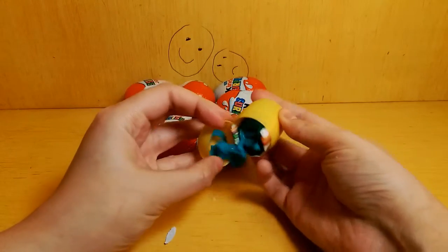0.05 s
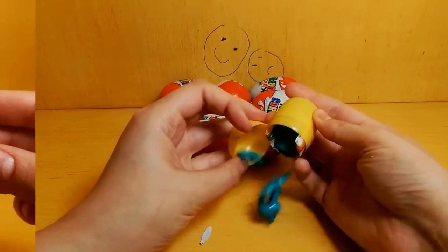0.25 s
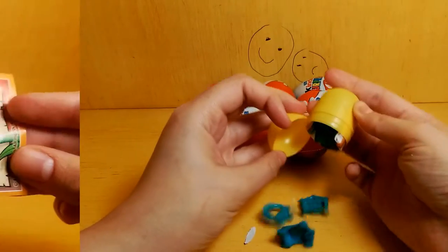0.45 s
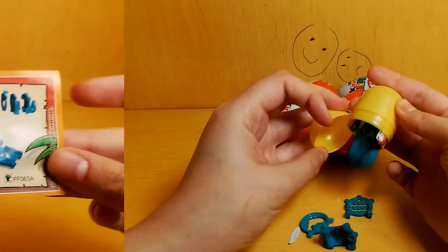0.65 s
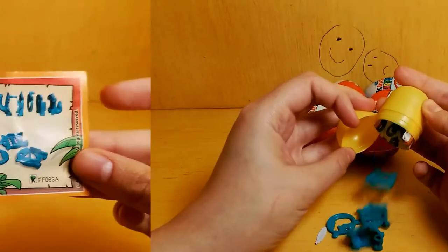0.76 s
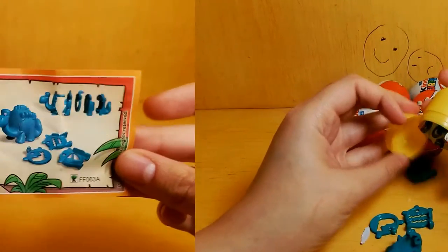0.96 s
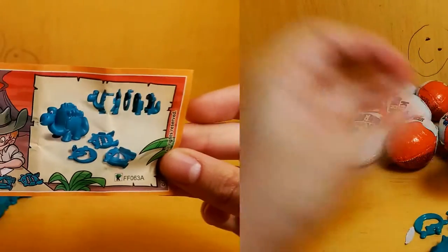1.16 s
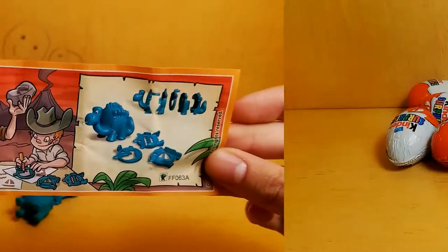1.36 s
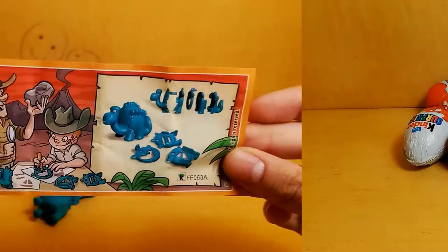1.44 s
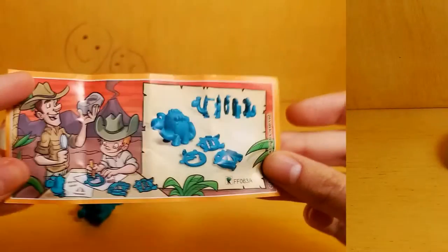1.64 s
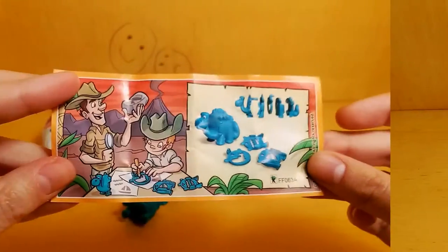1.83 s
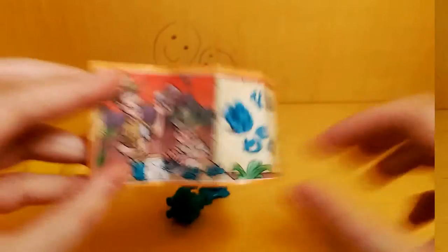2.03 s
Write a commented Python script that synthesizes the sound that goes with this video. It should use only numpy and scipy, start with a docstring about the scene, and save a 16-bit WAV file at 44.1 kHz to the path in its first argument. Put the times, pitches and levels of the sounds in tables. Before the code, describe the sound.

Plastic toy pieces click and bounce on a wooden desk, close to the microphone and slightly right. One bigger piece drops after them and rocks still, before a brief, soft paper rustle over a low room hum.

```python
"""A wooden desk in a small humming room, the microphone close by, the action a little to its right.
First small hard plastic toy parts slide in their capsule. They tip out, several land together and
bounce to rest, each contact a click and a short clatter that rings the part and the desk under it.
A last, larger part follows and rocks until it settles. Then a paper leaflet is handled softly, its
creases crackling and the sheet flapping, over the low hum of the room."""
import sys
import numpy as np
from scipy import signal
from scipy.fft import rfft, irfft, next_fast_len
from scipy.io import wavfile
from scipy.ndimage import uniform_filter1d

SR = 44100
rng = np.random.default_rng(int(sys.argv[2]) if len(sys.argv) > 2 else 0)


def store_pcm(level_fs):
    """Save levels as 16-bit WAV."""
    pcm = np.round(np.clip(level_fs, -1, 1) * 32767).astype(np.int16)
    wavfile.write(sys.argv[1], SR, np.atleast_2d(pcm).T)


N = 92610

# The four bands of a contact. Each row: lower edge in Hz, upper edge in Hz.
CONTACT_BANDS = [(700, 1600), (1600, 4000), (4000, 7500), (7500, 16000)]
# Parts shift in the capsule. Each row: start in seconds, then level in dB in each contact band.
CAPSULE_SHIFTS = [(.1087, -65.5, -58, -55.5, -40), (.1155, -72, -50.5, -46.5, -63),
                  (.13, -56, -52, -47.5, -40.5)]
# A part strikes the desk or another part. Each row: start in seconds, then level in dB in each band.
LANDINGS = [(0.2043, -29.5, -23.5, -21.5, -21), (0.216, -28, -21.5, -23, -28),
            (0.2296, -48, -56, -32, -29.5), (0.2484, -37, -37.5, -40, -48),
            (0.2723, -30.5, -30, -33.5, -64), (0.2925, -40, -58, -43, -27), (0.309, -47, -58, -63, -48),
            (0.3214, -44.5, -39, -48, -59), (0.3319, -30, -28.5, -30.5, -25.5),
            (0.3472, -34, -27.5, -30.5, -41), (0.372, -34.5, -34, -34, -36), (0.3816, -38, -28, -30, -34),
            (0.4094, -32.5, -32.5, -29.5, -29.5), (0.4184, -40, -33, -33, -55),
            (0.4267, -34, -39, -42, -40), (0.4295, -50, -47, -34, -28.5), (0.4418, -37.5, -33.5, -44, -34),
            (0.4541, -41.5, -37.5, -37.5, -57), (0.4672, -42, -42.5, -30.5, -33),
            (0.499, -40.5, -51, -36.5, -26.5), (0.5058, -40.5, -40, -38, -41),
            (0.5304, -48, -47, -40, -35.5), (0.549, -59.5, -56, -59, -39), (0.5658, -49, -58, -47, -45),
            (0.6241, -53.5, -51.5, -46, -49), (0.638, -49, -47, -47.5, -43.5),
            (0.666, -51, -55, -42.5, -44), (0.7231, -63, -54.5, -53, -55), (0.7558, -26.5, -22, -28, -29),
            (0.798, -58, -50, -38, -45.5), (0.8211, -42, -46, -42, -41), (0.8462, -32, -28, -27, -38.5),
            (0.8632, -49.5, -66, -45, -43.5), (0.9228, -38.5, -41, -31.5, -42.5),
            (0.9515, -36.5, -38.5, -29, -32), (0.9764, -40.5, -44, -41, -39),
            (1.0034, -45.5, -42, -35, -38.5), (1.023, -40, -52, -33.5, -44.5),
            (1.0365, -43, -50.5, -47, -45), (1.043, -65, -46.5, -39, -41),
            (1.0624, -49.5, -52, -35.5, -44.5), (1.0904, -53, -54, -46, -46),
            (1.1151, -59, -54.5, -45.5, -46)]
# Where a part lands, one resonance speaks out or is muted.
# Each row: start in seconds, frequency in Hz, width in Hz, gain in dB.
LANDING_ACCENTS = [(.2045, 9100, 400, 8), (.2928, 12660, 800, 9), (.7557, 424, 45, 6),
                   (.7557, 1017, 111, 11), (.7557, 2830, 98, 10), (.7557, 5020, 1640, -22),
                   (.8463, 1030, 120, 11), (.8463, 2966, 150, 5)]
# Parts slide in the capsule, then skitter between bounces. Each row: time in seconds, level in dB.
SKITTER_LEVEL = [(0, -54), (.08, -48), (.19, -59.5), (.33, -45), (.44, -43.5), (.58, -47), (.61, -55),
                 (.69, -55.5), (1.0, -86), (1.04, -51), (1.13, -66.5), (1.171, -99.5)]
# Resonances of the hollow capsule, the small parts, the large part and the desk.
# Each row: frequency in Hz, width in Hz, level in dB over the plain knock.
CAPSULE_MODES = [(2000, 24, 10), (3200, 130, 8.5)]
SMALL_PART_MODES = [(1012.5, 45, 11), (1853, 30, -5.5), (2847, 47, 9.5), (3270, 32, -2), (4534, 38, 7.5),
                    (8950, 490, 1.5)]
LARGE_PART_MODES = [(1368, 34, 5.5), (2930, 190, 0), (9040, 850, 6.5)]
DESK_MODES = [(104, 21, 11), (145.2, 13.2, 10.5), (184, 14.8, 16.5), (411.5, 24.7, 5), (801.7, 24, 8.5),
              (1137, 12, 2.5), (2224, 167, 5.5)]
# The parts' place at the microphone. Each row: frequency in Hz, left minus right in dB.
MIC_BALANCE = [(100, -2.5), (450, -2), (1000, 0), (2000, -4.5), (5000, -11.5), (9000, -7.5), (14000, 0.5)]
# The leaflet flexes. Each row: centre and spread in seconds, crackle level in dB, flap level in dB.
LEAFLET_FLEXES = [(1.618, 0.005, -58, -71), (1.948, 0.0069, -61.5, -54), (1.965, 0.0043, -52, -50),
                  (2.033, 0.042, -63, -63)]
# Tone colours. Each row: frequency in Hz, gain in dB.
KNOCK_COLOUR = [(40, -47), (110, -1.5), (230, -3), (315, -2.5), (430, -1), (680, -12), (1000, -3.5),
                (1700, -1), (2500, -3), (7500, -3), (13000, -3), (15500, -13)]  # plastic on wood
SKITTER_COLOUR = [(200, -12.5), (1000, -1), (3000, -10), (7000, -6), (14000, -16)]
CRACKLE_COLOUR = [(500, 1), (1500, -3.5), (4000, -0.5), (7000, -6.5), (9500, 1), (15000, -11)]
FLAP_COLOUR = [(60, -17), (140, 8.5), (260, -4), (380, 5.5), (620, -19.5), (790, 6.5), (1050, -15),
               (1620, -12), (9000, -30)]
REFLECTION_COLOUR = [(100, 3.5), (400, 6.5), (1200, -0.5), (4000, 4), (9000, -6), (15000, 1)]
AIR_COLOUR = [(30, -31), (52, -7), (80, -7.5), (130, 1.5), (175, -11.5), (230, -15), (380, -9.5),
              (620, -19), (1000, -17.5), (2000, -22), (4000, -26), (7000, -34), (9500, -30.5),
              (15000, -34.5)]
# How alike the two channels are. Each row: frequency in Hz, left-right likeness from 0 to 1.
REFLECTION_LIKENESS = [(200, 0.94), (700, 0.73), (2000, 0), (6000, 0)]
AIR_LIKENESS = [(180, 0.99), (550, 0.38), (1650, 0)]
# The room's hum. Each row: frequency in Hz, width in Hz. Then one level in dB for each tone.
HUM_TONES = [(53, 8), (143, 21.6), (388, 10), (557, 15)]
HUM_LEVELS = [-81, -65, -72.5, -74.5]
# A low rumble swells as the hands move. Each row: time in seconds, level in dB.
RUMBLE_LEVEL = [(.88, -67), (1.05, -58), (1.29, -66), (1.34, -69), (1.52, -65), (1.68, -57), (1.75, -51.5),
                (1.86, -65)]

LARGE_PART_FROM_S = .74
CLICK_DB, RING_S = -9, .0057  # click against clatter; the clatter's time constant
CRACK_S, CRACK_SHARE = .0032, .6  # the first, fast-dying part of the clatter
THUD_HZ, THUD_FULL_DB, THUD_FALL = 200, -30, .2  # lighter contacts lose extra bass, dB per dB short
MODE_SPREAD_DB, MODE_DETUNE = 3, .004  # from one contact to the next
LEFT_LAG_S, WALL_DELAY_S = .00033, .0028
NEAR_DB, NEAR_T60_S = -8.5, .15  # reflections from the desk and the wall behind it
ROOM_DB, ROOM_T60_S = -9, .4
CREASES_PER_S = 4500
AIR_DB, HUM_PAN_DB = -58, -6.5  # the pan is left minus right


def toy_parts():
    """Close up, the parts ring the capsule, then themselves and the desk as they land."""
    t = np.arange(N) / SR
    in_capsule = t < LANDINGS[0][0]
    slide = skitter(per_s=600) * in_capsule
    slide = signal.sosfilt(signal.butter(1, 4000, fs=SR, output="sos"), slide)
    inside = contacts(CAPSULE_SHIFTS, CAPSULE_MODES) + slide + ringing(slide, CAPSULE_MODES)
    small = contacts([row for row in LANDINGS if row[0] < LARGE_PART_FROM_S], SMALL_PART_MODES)
    large = contacts([row for row in LANDINGS if row[0] >= LARGE_PART_FROM_S], LARGE_PART_MODES)
    rattle = skitter(per_s=1000) * ~in_capsule
    rattle = rattle + ringing(rattle * (t < LARGE_PART_FROM_S), SMALL_PART_MODES)
    on_desk = colour(small + large + rattle, KNOCK_COLOUR)
    plastic = colour(inside, KNOCK_COLOUR) + on_desk
    return at_microphone(plastic, desk=ringing(on_desk, DESK_MODES))


def contacts(rows, modes, size=4096):
    """Each contact is a sharp click and milliseconds of dense clatter, ringing the modes its own way."""
    out, t = np.zeros((2, N + size)), np.arange(size) / SR
    low, high = np.transpose(CONTACT_BANDS)
    width_db = 10 * np.log10(RING_S * SR * SR / 2 / (high - low))  # band level to filter gain
    decay = rms_one(np.exp(-t / RING_S) + CRACK_SHARE * np.exp(-t / CRACK_S)) / np.sqrt(size)
    low_cut = signal.butter(2, 600, "high", fs=SR, output="sos")
    for start_s, *band_db in rows:
        hit = signal.sosfilt(low_cut, stereo_noise(size, likeness=.16) * decay)
        hit[:, 0] += amp(CLICK_DB)
        gain_db = band_db + width_db
        thud_db = gain_db[0] + THUD_FALL * min(band_db[0] - THUD_FULL_DB, 0)
        hit = colour(hit, [(THUD_HZ, thud_db), *zip(np.sqrt(low * high), gain_db)])
        struck = [(hz * (1 + MODE_DETUNE * rng.uniform(-1, 1)), width,
                   db + MODE_SPREAD_DB * rng.uniform(-1, 1)) for hz, width, db in modes]
        hit = hit + ringing(hit, struck)
        for accent_s, hz, width, db in LANDING_ACCENTS:
            if abs(accent_s - start_s) < .005:
                hit = hit + (amp(db) - 1) * resonate(hit, hz, width)
        start = int(start_s * SR)
        out[:, start:start + size] += hit
    return out[:, :N]


def skitter(per_s):
    """A run of tiny random touches as the parts slide and tremble."""
    sizes_db = 2.5 * np.minimum(rng.exponential(1, N), 4)
    sizes = amp(sizes_db) * rng.choice([-1, 1], N)
    touches = sizes * (rng.random(N) < per_s / SR)
    return rms_one(colour(touches, SKITTER_COLOUR)) * fader(SKITTER_LEVEL)


def ringing(x, modes):
    """What a body adds to a knock: its resonances, side by side."""
    return sum(amp(db) * resonate(x, hz, width) for hz, width, db in modes)


def at_microphone(plastic, desk):
    """The knocks reach the right channel first, with near reflections and the room behind them."""
    body = plastic + desk
    bright = signal.sosfilt(signal.butter(2, 200, "high", fs=SR, output="sos"), plastic)
    near = colour(amp(NEAR_DB) * reflections(bright, NEAR_T60_S), REFLECTION_COLOUR)
    room = colour(amp(ROOM_DB) * reflections(body, ROOM_T60_S), REFLECTION_COLOUR)
    direct = [colour(x, np.array(MIC_BALANCE) * [1, side / 2]) for x, side in zip(body, (1, -1))]
    left, right = near + direct
    late_left = np.pad(left, (int(LEFT_LAG_S * SR), 0))[:N]
    return np.array([late_left, right]) + room


def reflections(x, t60):
    """Sound comes back off the surfaces as a diffuse dying tail, different in each channel."""
    t = np.arange(SR // 2) / SR
    likeness = at_hz(REFLECTION_LIKENESS, np.fft.rfftfreq(len(t), 1 / SR))
    onset = np.clip(t / WALL_DELAY_S - 1, 0, 1)
    tail = stereo_noise(len(t), likeness) * amp(-60 * t / t60) * onset
    return signal.fftconvolve(x.mean(0)[None], rms_one(tail) / np.sqrt(len(t)), axes=1)[:, :N]


def leaflet():
    """Each flex is a short swell of tiny crease clicks and a soft flap of the sheet."""
    t = np.arange(N) / SR
    creases = rng.standard_normal((2, N)) * (rng.random(N) < CREASES_PER_S / SR)
    crackle = rms_one(colour(creases, CRACKLE_COLOUR))
    flap = rms_one(colour(stereo_noise(N, likeness=.47), FLAP_COLOUR))
    paper = np.zeros((2, N))
    for centre_s, spread_s, crackle_db, flap_db in LEAFLET_FLEXES:
        swell = np.exp(-((t - centre_s) / spread_s) ** 2 / 2)
        paper += swell * (amp(crackle_db) * crackle + amp(flap_db) * flap)
    return paper


def room_tone():
    """Air all round the microphone; to the right, a wavering hum and the rumble of moving hands."""
    likeness = at_hz(AIR_LIKENESS, np.fft.rfftfreq(N, 1 / SR))
    air = amp(AIR_DB) * rms_one(colour(stereo_noise(N, likeness), AIR_COLOUR))
    hum = sum(amp(db) * narrow_noise(hz, width) for (hz, width), db in zip(HUM_TONES, HUM_LEVELS))
    rumble = narrow_noise(hz=53.8, width_hz=4.3)
    rumble /= np.sqrt(uniform_filter1d(rumble ** 2, size=3000) + .02)  # evens out its random swells
    pan = amp(np.array([[1], [-1]]) * HUM_PAN_DB / 2)
    return air + (hum + rumble * fader(RUMBLE_LEVEL)) * pan


def narrow_noise(hz, width_hz):
    """A wavering low tone: noise twice through one resonance, unit rms."""
    once = resonate(rng.standard_normal(N + SR), hz, width_hz)
    return rms_one(resonate(once, hz, width_hz)[SR:])


def stereo_noise(n, likeness):
    """White noise in two channels that are partly alike."""
    mid, side = rfft(rng.standard_normal((2, n)))
    mid, side = mid * np.sqrt((1 + likeness) / 2), side * np.sqrt((1 - likeness) / 2)
    return irfft(np.array([mid + side, mid - side]), n)


def resonate(x, hz, width_hz):
    """One resonance with gain 1 at its peak."""
    r = np.exp(-np.pi * width_hz / SR)
    feedback = [1, -2 * r * np.cos(2 * np.pi * hz / SR), r * r]
    return signal.lfilter(np.array([1, 0, -1]) * (1 - r * r) / 2, feedback, x + 1e-18)


def colour(x, points):
    """Causal (minimum-phase) filter that follows rows of frequency in Hz and gain in dB."""
    n = x.shape[-1]
    size = 2 * next_fast_len(n)
    gain = amp(at_hz(points, np.fft.rfftfreq(size, 1 / SR)))
    cepstrum = irfft(np.log(gain))
    cepstrum[1:size // 2] *= 2
    cepstrum[size // 2 + 1:] = 0
    return irfft(rfft(x, size) * np.exp(rfft(cepstrum)))[..., :n]


def at_hz(points, hz):
    """Read a table on a log-frequency axis."""
    table_hz, value = np.transpose(points)
    return np.interp(np.log(np.maximum(hz, 1)), np.log(table_hz), value)


def fader(points):
    """Gain that follows rows of time in seconds and level in dB."""
    return amp(np.interp(np.arange(N) / SR, *np.transpose(points)))


def amp(db):
    """Decibels to gain."""
    return 10 ** (np.asarray(db) / 20)


def rms_one(x):
    """Scale to unit rms."""
    return x / np.sqrt(np.mean(x ** 2) + 1e-20)


def scene():
    """Parts and leaflet at the desk, the room behind them."""
    return toy_parts() + leaflet() + room_tone()


def record(dry):
    """The top is cut steeply above 16 kHz."""
    return signal.sosfilt(signal.ellip(10, .2, 80, 16000, fs=SR, output="sos"), dry)


dry = scene()
out = record(dry)
store_pcm(out)
```